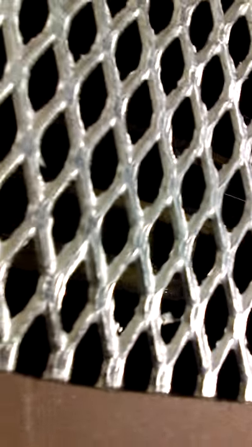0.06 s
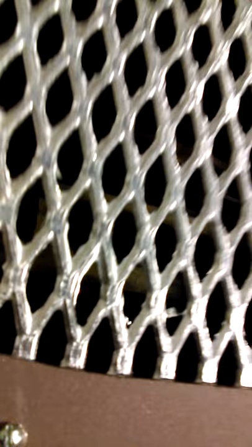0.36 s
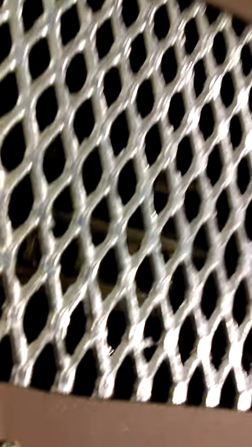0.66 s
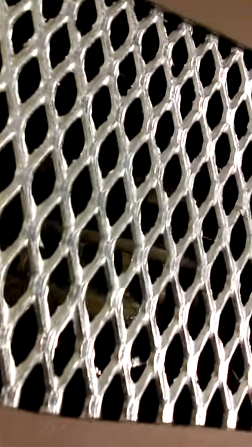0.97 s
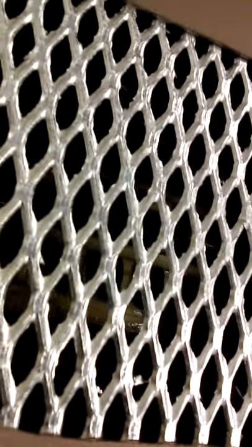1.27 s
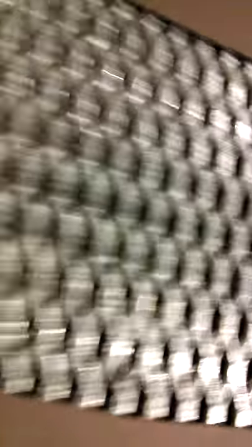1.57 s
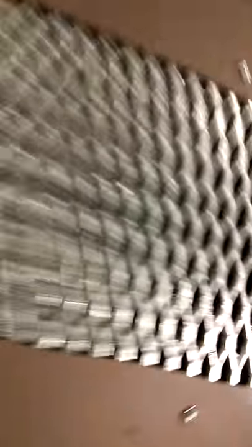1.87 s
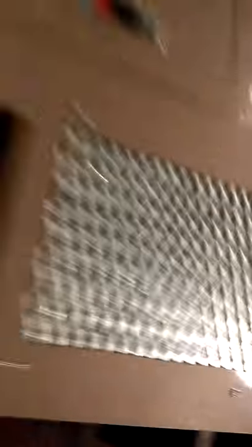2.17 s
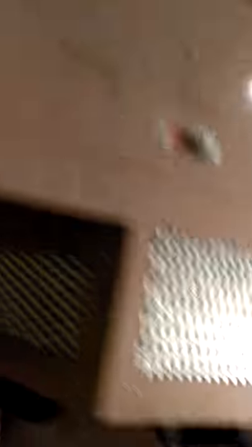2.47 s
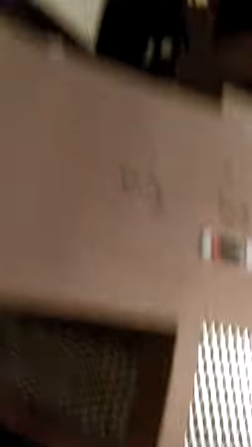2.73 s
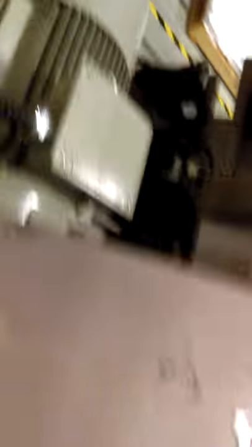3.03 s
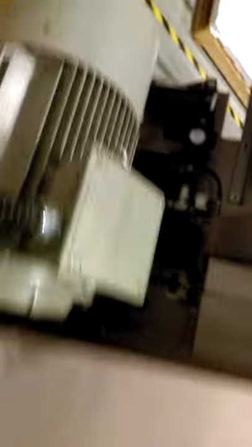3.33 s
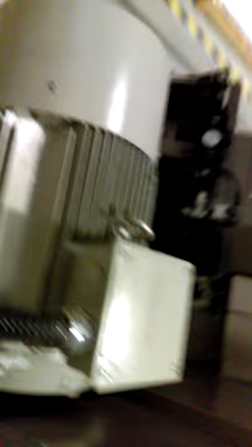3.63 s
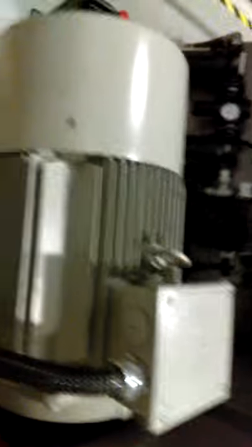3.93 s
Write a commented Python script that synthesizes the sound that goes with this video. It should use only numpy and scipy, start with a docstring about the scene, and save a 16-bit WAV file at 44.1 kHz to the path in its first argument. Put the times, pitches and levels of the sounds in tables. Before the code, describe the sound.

Fast, regular metallic knocking from a press fades as a motor's hissing whine grows.

```python
"""From the start, a press knocks five times a second inside its steel housing, over workshop rumble
and motor hum. Each blow cracks, rattles round the cabinet and leaves its panels and the room ringing.
At first the microphone is at the mesh guard, where the knocks are loud. Then it moves up to the
motor: after about two seconds the knocks fade, and towards the end the hissing whine and thin
whistle of the motor's drive grow."""
import sys
import numpy as np
from scipy import signal
from scipy.fft import rfft, irfft
from scipy.io import wavfile
from scipy.ndimage import uniform_filter1d

SR = 44100
rng = np.random.default_rng(int(sys.argv[2]) if len(sys.argv) > 2 else 0)


def generate_wav(sig):
    """Save sig (samples, or channels by samples) to the path in sys.argv[1] as 16-bit PCM at SR."""
    pcm = np.round(np.clip(np.atleast_2d(sig).T, -1, 1) * 32767).astype(np.int16)
    wavfile.write(sys.argv[1], SR, pcm)


N = 176400

# The microphone's path. Each row: time in seconds, position from 0 (guard) to 1 (motor).
MIC_PATH = [(0, 0.14), (1.5, 0.24), (2.2, 0.52), (2.8, 0.79), (3.3, 0.9), (4, 0.82)]
# How near the whining drive sounds. Each row: time in seconds, nearness from 0 (far) to 1 (close).
DRIVE_NEARNESS = [(0, 0.21), (.7, 0.13), (2.4, 0.15), (2.75, 0.36), (3.05, 0.49), (3.35, 0.7), (4, 0.75)]
# The tones of the steel panels. Each row: pitch in Hz, level at the guard in dB, change by the motor
# in dB, t60 (seconds to die away by 60 dB), pan (left minus right) in dB.
PANEL_TONES = [(459.9, -29.5, -4.5, 0.31, -12), (598.4, -23, -23, 0.43, -4), (661, -35.5, 4, 0.55, -1),
               (858.3, -28.5, 10.5, 0.51, 6), (866.5, -36.5, 11, 0.52, 16), (1167, -29, -3.5, 0.38, 17),
               (1296, -21, -1.5, 0.13, 28), (1403, -26, 5, 0.23, 4), (1779, -16.5, 6, 0.13, -1),
               (1819, -14, -2, 0.23, 7.5), (1930, -20, -1.5, 0.45, 0.5), (2118, -21, -4, 0.3, 15),
               (2170, -19, -3, 0.22, -1), (2266, -8.5, -6.5, 0.055, 6), (2590, -21.5, -1, 0.11, 3)]
DETUNE = .003  # share by which a ringing pitch varies from blow to blow


def undb(db):
    """Turn decibels into a gain."""
    return 10 ** (np.asarray(db) / 20)


def unit(x):
    """Scale to an average level (rms) of 1."""
    return x / np.sqrt(np.mean(x ** 2))


def steady(x):
    """Hold each side's level near 1, averaged over a quarter of a second."""
    return x / np.sqrt(uniform_filter1d(x ** 2, size=11025))


def pan(db):
    """Left and right gains that make the left louder by this many dB."""
    both = undb(np.array([[.5], [-.5]]) * db)
    return both / np.sqrt(np.mean(both ** 2, axis=0))


def over_hz(points, f):
    """Read a curve of (Hz, value) points on a log-frequency axis."""
    hz, value = np.array(points, float).T
    return np.interp(np.log(f + 1), np.log(hz), value)


def over_time(points, seconds=np.arange(N) / SR):
    """Read a curve of (seconds, value) points at one time, or else at every sample."""
    return np.interp(seconds, *np.array(points, float).T)


def freqs(size):
    """The frequencies in the spectrum of this many samples."""
    return np.fft.rfftfreq(size, 1 / SR)


def causal(gain):
    """A filter with these gains that never sounds before the blow (minimum phase)."""
    cepstrum = irfft(np.log(gain + 1e-9))
    half = cepstrum.shape[-1] // 2
    cepstrum[..., 1:half] *= 2
    cepstrum[..., half + 1:] = 0
    return np.exp(rfft(cepstrum))


def stereo_noise(size, likeness):
    """White noise whose two sides are alike by the given amounts."""
    mid, side = rfft(rng.standard_normal((2, size)))
    alike = np.clip(over_hz(likeness, freqs(size)), -.99, .99)
    common = mid * np.sqrt((1 + alike) / 2)
    opposite = np.array([[1], [-1]]) * side * np.sqrt((1 - alike) / 2)
    return irfft(common + opposite, size)


def wander(rate_hz):
    """A smooth random drift with a typical size of 1."""
    return unit(irfft(rfft(rng.standard_normal(N)) / (1 + (freqs(N) / rate_hz) ** 4), N))


def fade(t, t60):
    """Stay at 1 until t is 0, then fall by 60 dB every t60 seconds."""
    return np.exp(-np.log(1000) * np.maximum(t, 0) / t60)


def rise(t, seconds):
    """Climb from 0 towards 1, about two thirds of the way in this time."""
    return 1 - np.exp(-t / seconds)


def add(out, x, start):
    """Mix a sound in from a start time in seconds."""
    i = int(round(start * SR))
    a, b = max(i, 0), min(i + x.shape[-1], N)
    out[:, a:b] += x[:, a - i:b - i]


def workshop():
    """Steady rumble and rush of the running machine; the rumble is strongest at the guard."""
    # The noise's tone colour. Each row: frequency in Hz, relative level in dB.
    colour = [(25, -27), (42, -19), (60, -17), (88, 8.5), (115, 1), (195, -8), (270, 1), (370, -5),
              (460, -2.5), (720, -3.5), (860, -3), (1050, -9), (1350, -3.5), (1600, -6), (1920, -4.5),
              (2400, -11), (3100, -18.5), (4800, -29), (6500, -36), (13000, -34)]
    # Which side is louder. Each row: frequency in Hz, left minus right in dB.
    balance = [(100, -0.5), (300, -0.5), (900, -3.5), (1500, 14), (2200, 5), (3200, -2), (5000, -3),
               (8000, -1)]
    # How alike the two sides are. Each row: frequency in Hz, likeness from 0 to 1.
    likeness = [(60, 0.89), (150, 1), (300, 0.82), (600, 0.75), (1000, 0.13)]
    # How the colour changes by the motor. Each row: frequency in Hz, change in dB.
    motor_change = [(80, -10.5), (150, 0.5), (400, -4.5), (1000, 0), (2500, 2.5), (5500, -3)]
    f, away = freqs(N), over_time(MIC_PATH)
    noise = rfft(stereo_noise(N, likeness))
    at_guard = unit(irfft(noise * undb(over_hz(colour, f)) * pan(over_hz(balance, f)), N))
    by_motor = irfft(rfft(at_guard) * undb(over_hz(motor_change, f)), N)
    return undb(-33) * (at_guard * (1 - away) + by_motor * away)


def motor_hum():
    """The motor and fan hum with tones that waver in level and a little in pitch."""
    # The hum's tones. Each row: pitch in Hz, level at the guard in dB, level by the motor in dB.
    tones = [(45, -54, -49), (84.5, -44.5, -59), (177.3, -53.5, -52), (230.8, -55, -44.5),
             (323.8, -47, -58), (736, -79, -41), (804, -54, -55.5), (879, -46, -55.5)]
    out, away = 0, over_time(MIC_PATH)
    for hz, guard_db, motor_db in tones:
        pitch = hz * (1 + 0.004 * wander(rate_hz=4.58))
        tone = np.sin(2 * np.pi * np.cumsum(pitch) / SR)
        waver = undb(1.5 * wander(rate_hz=4))
        out = out + undb(guard_db + (motor_db - guard_db) * away) * unit(tone * waver)
    return out


def reflections(x, count=3):
    """Reflections cut fine peaks and dips into a sound; they shift as the microphone moves."""
    depth_db, spacing_hz, cycles_per_s = 4.5, 60.6, 0.427
    f, spectrum, out = freqs(N), rfft(x), 0
    for k, dips in enumerate(rng.standard_normal((count, 2, 1024))):
        ripple = np.array([np.interp(f / spacing_hz, np.arange(len(side)), side) for side in dips])
        share = np.cos(np.pi * (cycles_per_s * np.arange(N) / SR + k / count)) ** 4
        out = out + share * irfft(spectrum * undb(depth_db * ripple), N)
    return out


def drive_whine():
    """Hissing bands at the drive's switching rate and its multiples pulse with the motor current."""
    # The whine's bands. Each row: centre in Hz, width in Hz, level far off in dB, level close by
    # in dB, left minus right far off in dB, left minus right close by in dB.
    bands = [(4030, 364, -43, -36, 8.5, 2), (8004, 620, -48.5, -32.5, 2.5, -20),
             (8350, 1210, -49.5, -37, -16, -6), (11890, 1540, -52, -35, -10, -18)]
    pulse_hz, pulse_depth, steepness = 64, 0.087, 5.7
    f, near, out = freqs(N), over_time(DRIVE_NEARNESS), 0
    pulse = 1 + pulse_depth * np.sin(2 * np.pi * pulse_hz * np.arange(N) / SR)
    hiss = rfft(reflections(rng.standard_normal((2, N))))
    for hz, width, far_db, close_db, far_pan_db, close_pan_db in bands:
        shape = (1 + 2 * ((f - hz) / width) ** 2) ** (-steepness / 4)
        band = steady(irfft(hiss * shape, N) * pulse)
        level = undb(far_db + (close_db - far_db) * near)
        out = out + band * level * pan(far_pan_db + (close_pan_db - far_pan_db) * near)
    return out


def drive_whistle():
    """A thin whistle in the lowest whine band; it wavers in pitch and flutters on each side."""
    hz, flutter_hz, far_db, close_db = 4058, 15, -48.5, -34.5
    pitch = hz * (1 + .007 * wander(flutter_hz))
    phase = 2 * np.pi * np.cumsum(pitch) / SR
    sides = np.array([np.sin(phase) * wander(flutter_hz) + np.cos(phase) * wander(flutter_hz)
                      for _ in range(2)])
    return sides * undb(far_db + (close_db - far_db) * over_time(DRIVE_NEARNESS)) * pan(db=3)


def hollow_tone(t, hz, t60):
    """The room rings: a low hollow tone that swells after the blow and outlasts it."""
    late = np.maximum(t - 0.029, 0)
    pitch = hz * (1 + DETUNE * rng.standard_normal())
    wave = np.sin(2 * np.pi * (pitch * t + rng.random()))
    return undb(-32) * wave * rise(late, 0.0068) * fade(late, t60)


def panel_ring(phases, t, away):
    """The housing's panels ring on, a little differently at every blow."""
    out, scatter_db = 0, 1.97
    chance = rng.standard_normal((len(PANEL_TONES), 2))
    for (hz, db, away_db, t60, pan_db), phase, (louder, higher) in zip(PANEL_TONES, phases, chance):
        wave = np.sin(2 * np.pi * (hz * (1 + DETUNE * higher) * t + phase))
        level = undb(db + away_db * away + scatter_db * louder)
        out = out + level * pan(pan_db) * wave * fade(t, t60)
    return undb(1) * out * rise(t, 0.0026 + 0.0066 * away)


def cabinet_rattle(echoes, t, away):
    """Metal strikes metal and bounces once; dense echoes swell, hold and die, the treble first."""
    # The cabinet's tone colour. Each row: frequency in Hz, relative level in dB.
    colour = [(40, -7), (85, -12.5), (200, -14), (370, -10.5), (470, -3.5), (610, -4.5), (740, -6.5),
              (880, 0.5), (1080, -9.5), (1250, -2), (1580, -9.5), (1830, 9), (2030, -4.5), (2180, 1.5),
              (2700, -6), (3000, -17), (4500, -33.5), (6500, -32), (9000, -40), (13000, -49)]
    # Which side is louder. Each row: frequency in Hz, left minus right in dB.
    balance = [(100, -5), (900, 1), (1300, -2), (1600, 14.5), (1850, 13.5), (2200, -4), (2600, -10),
               (3300, 15), (4500, -6), (7000, -6.5)]
    # How the echoes die. Each row: frequency in Hz, hold in seconds, seconds to fall by 60 dB.
    decays = [(90, 0.027, 0.72), (293, 0.036, 0.6), (630, 0.05, 0.23), (1840, 0.037, 0.26),
              (2450, 0.034, 0.22), (5800, 0.053, 0.096)]
    strike_above_hz, bounce_s = 1840, 0.0078
    f, spectrum, ring = freqs(len(t)), rfft(echoes), 0
    for k, (_, hold, t60) in enumerate(decays):
        band = over_hz([(row[0], j == k) for j, row in enumerate(decays)], f)
        ring = ring + irfft(spectrum * band) * rise(t, 0.0072) * fade(t - hold, t60)
    bounce = undb(-7) * (t > bounce_s) * fade(t - bounce_s, t60=0.012)
    treble = irfft(spectrum * f ** 2 / (f ** 2 + strike_above_hz ** 2))
    strike = treble * (fade(t, t60=0.055) + bounce) * undb(10.5 - 4 * away)
    housing = unit(undb(over_hz(colour, f))) * pan(over_hz(balance, f))
    return undb(-18) * irfft(rfft(ring + strike) * causal(housing))


def press(size=24576):
    """Each blow sets off nearly the same echoes; they change slowly as the microphone moves."""
    # The blows. Each row: start in seconds, then the gains in dB of the low body, the bright clank
    # and the room's lower hollow tone.
    knocks = [(-.045, 0.5, 0.5, 6), (.159, 0.5, -1, -17), (.362, -1.5, -2.5, -1), (.565, -2, -10, -19),
              (.768, 0, -1, 1.5), (.971, -.5, -2, -15), (1.174, 2.1, 1, 8.5), (1.378, 1.5, 0, -16),
              (1.581, -0.5, -1, 3), (1.784, -1, 0, -25), (1.988, -3.5, 0, -6), (2.190, -5.5, -3.5, -4.5),
              (2.394, -5.5, -6.5, -1.5), (2.597, -6, -5.5, 1.5), (2.803, -10.5, -8, 2.5),
              (3.006, -10, -9, -4), (3.211, -7, -10.5, 6.5), (3.416, -9.5, -12, 2.5),
              (3.619, -10.5, -9.5, 1), (3.823, -10.5, -13, -5.5)]
    # The room's upper hollow tone, a standing wave that the microphone passes through.
    # Each row: time in seconds, gain in dB.
    upper_hollow = [(1.35, -8), (1.58, 7), (2.8, 6.5), (3.25, -2)]
    # How alike the echoes are on the two sides. Each row: frequency in Hz, likeness from 0 to 1.
    likeness = [(60, 1), (250, 0.42), (550, 0.64), (1200, 0.64), (2000, 0.39), (4000, 0.069)]
    # The clank moves left as the microphone turns. Each row: time in seconds, left minus right in dB.
    clank_pan = [(0, 1), (1.6, 0.5), (2.1, 6), (4, 1.5)]
    # How far the left wave runs ahead at the guard. Each row: frequency in Hz, lead in radians.
    left_lead = [(100, 1), (430, 0.35), (1200, -1.1), (1750, -5), (2400, -7), (3000, -7.5)]
    clank_above_hz, crack_above_hz = 1380.0, 4200.0
    repeat = 0.77  # how alike one blow's echoes are to the next one's
    t, f, out = np.arange(size) / SR, freqs(size), np.zeros((2, N))
    echoes = stereo_noise(size, likeness)
    phases = 0.37 * rng.random(len(PANEL_TONES))  # in cycles: the panels start nearly in step
    clank_band = f ** 8 / (f ** 8 + clank_above_hz ** 8)
    crack_band = f ** 8 / (f ** 8 + crack_above_hz ** 8)
    for start, body_db, clank_db, hollow_db in knocks:
        away = over_time(MIC_PATH, start)
        echoes = repeat * echoes + np.sqrt(1 - repeat ** 2) * stereo_noise(size, likeness)
        crack_db = 2.2 * max(body_db, 0)  # the hardest blows gain extra treble
        strength = undb(body_db + (clank_db - body_db) * clank_band + crack_db * crack_band)
        sides = pan(clank_band * over_time(clank_pan, start))
        room = undb(hollow_db) * hollow_tone(t, hz=456.3, t60=0.6)
        room += undb(over_time(upper_hollow, start)) * hollow_tone(t, hz=592, t60=0.23)
        steel = cabinet_rattle(echoes, t, away) + panel_ring(phases, t, away)
        blow = rfft(steel) * causal(strength * sides) + rfft(room)
        lead = np.array([[1], [0]]) * over_hz(left_lead, f) * (1 - away)
        add(out, irfft(blow * np.exp(1j * lead)), start)
    return out


def scene():
    """The knocking press over the workshop, the motor and its drive."""
    return press() + workshop() + motor_hum() + drive_whine() + drive_whistle()


def record(dry):
    """The recorder cuts the deep bass and the highest treble."""
    bass_cut = signal.butter(4, 51.6, "high", fs=SR, output="sos")
    treble_cut = signal.ellip(8, .2, 70, 13450, fs=SR, output="sos")
    return signal.sosfilt(treble_cut, signal.sosfilt(bass_cut, dry))


dry = scene()
out = record(dry)
generate_wav(out)
```